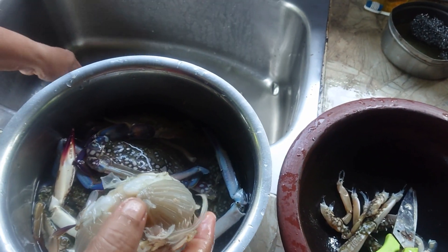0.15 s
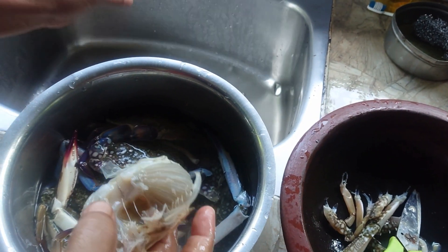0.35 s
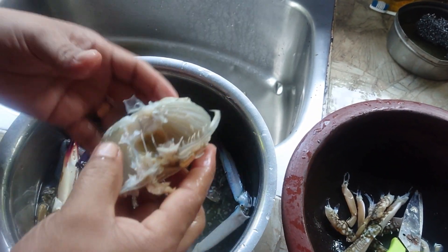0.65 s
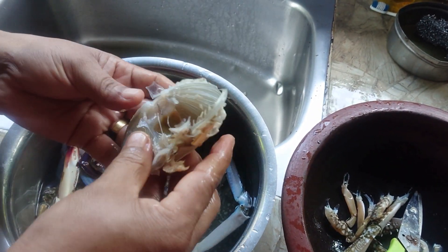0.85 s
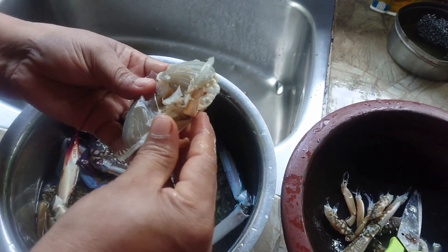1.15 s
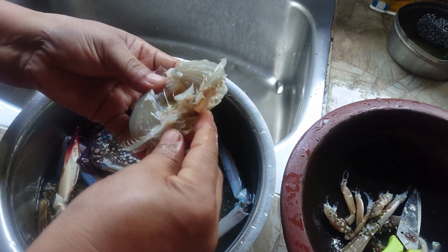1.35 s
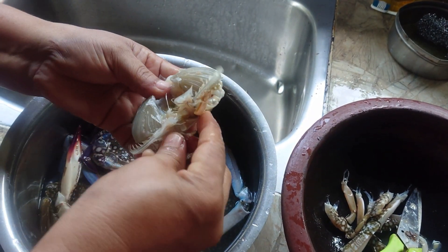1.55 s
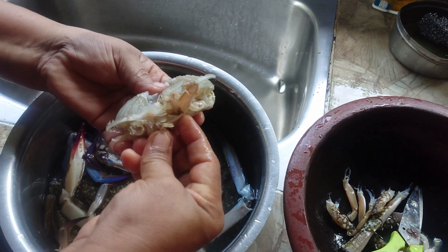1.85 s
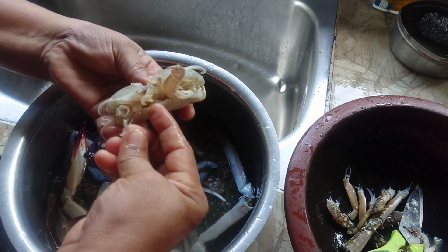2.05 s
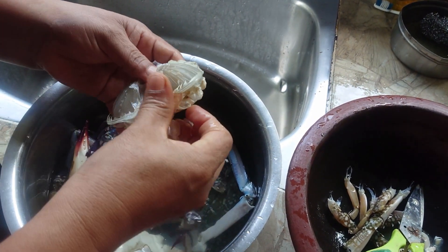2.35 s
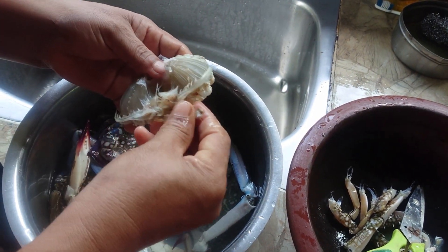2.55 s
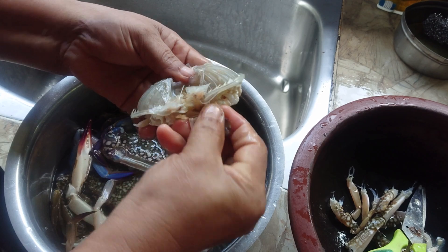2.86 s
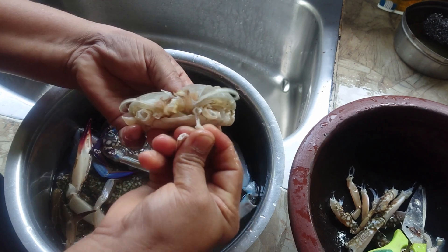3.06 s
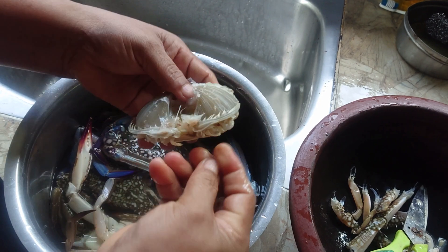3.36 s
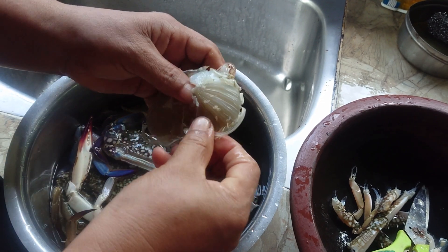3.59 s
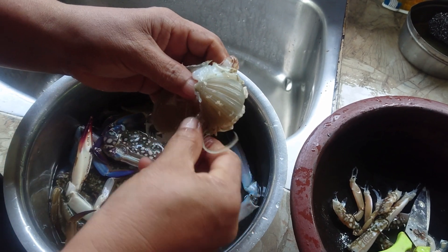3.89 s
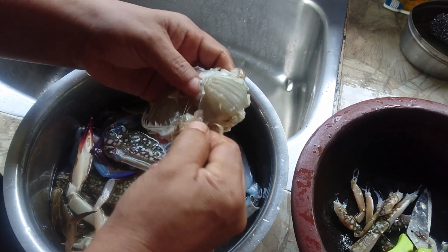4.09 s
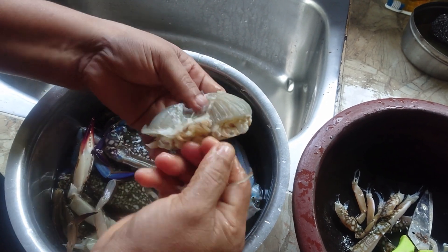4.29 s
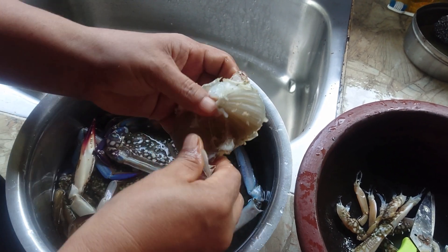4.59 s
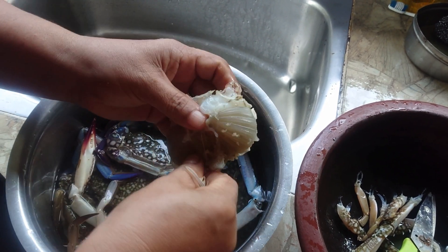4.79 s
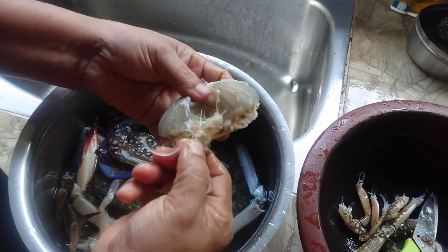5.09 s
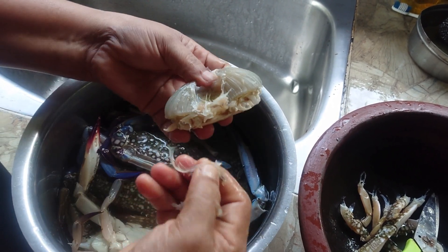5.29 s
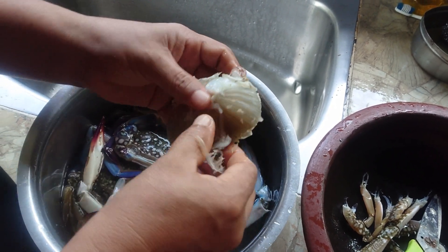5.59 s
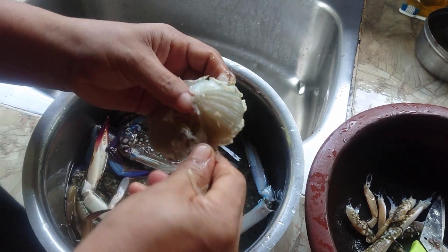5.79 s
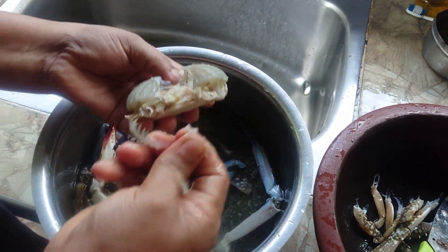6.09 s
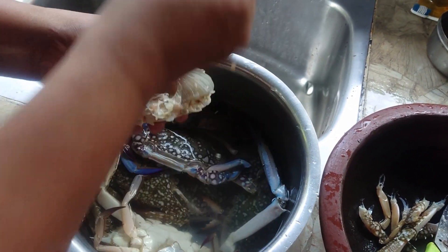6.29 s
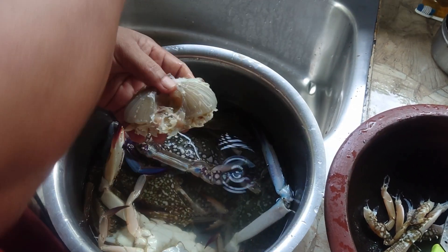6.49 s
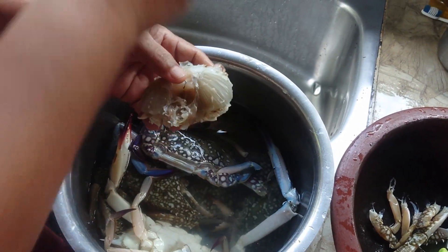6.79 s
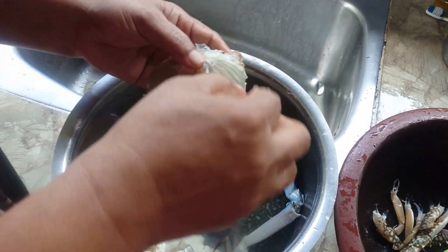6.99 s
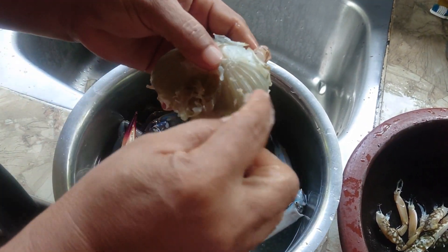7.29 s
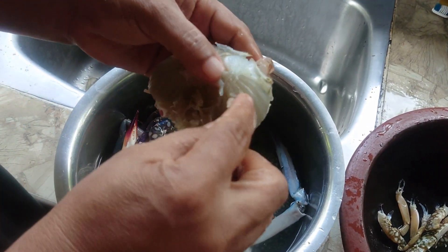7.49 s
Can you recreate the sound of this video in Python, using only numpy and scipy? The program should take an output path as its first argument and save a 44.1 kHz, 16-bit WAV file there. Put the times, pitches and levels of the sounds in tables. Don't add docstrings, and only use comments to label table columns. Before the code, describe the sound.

Low street rumble, soft tyre roar and a faint idling drone run throughout. At 0.28-0.6 s, crab scraps hit a steel basin in a dense burst of sharp crunchy cracks, the loudest event, with short low metallic ringing and rattling crumbs to about 0.8 s. A thin chirp follows at 0.9. Bright small snaps come at 1.8 and 2.0, a soft far knock at 2.5, and a double snap at 3.07. From 2.8 to about 5 a distant two-note bird repeats, with falling chirps and throbbing trills until 5.9. A faint snap at 4.3 leads to clusters of tiny ticks and tearing around 5.1 and 5.8-6.1, while a far engine speeds up. At 6.8 a scrap crunches into a clay pot with a brief dull ring; crumbs settle and traffic rises to 7.6. Close, lightly reverberant kitchen sound on the right; left has only quiet hiss.

```python
import sys
import numpy as np
from scipy import signal
from scipy.io import wavfile
from scipy.ndimage import uniform_filter1d

SR = 44100
rng = np.random.default_rng(int(sys.argv[2]) if len(sys.argv) > 2 else 0)


def generate_wav(sig):
    pcm = np.round(np.clip(np.atleast_2d(sig).T, -1, 1) * 32767).astype(np.int16)
    wavfile.write(sys.argv[1], SR, pcm)


def voltage_ratio(decibels):
    exponent = np.asarray(decibels, float) / 20
    return 10 ** exponent


N = 337365


def crab():
    snaps = finger_snaps() + pot_scatter()
    cracks = scrap_cracks()
    ring = basin_ring() + pot_ring()
    return snaps + cracks + ring + room(voltage_ratio(-16) * snaps + voltage_ratio(-11.5) * cracks + voltage_ratio(-7.5) * ring)


# start in seconds, peak in dB, body 1-3 kHz in relative dB,
# edge 9-15 kHz in relative dB, crunch length in ms.
DROPS = [(.2806, -27, 7, -4.5, 12.2), (0.2922, -18, -1, -11, 5.6), (.3049, -35, 11, -34, 7.8),
         (0.3161, -21.5, -6, -8, 4.9), (0.3204, -15.5, -2.5, -8, 6), (0.329, -42, 19, -19, 8.5),
         (0.3566, -38, -19, -3, 21), (0.4285, -43.5, 7, 0, 1.3), (0.46, -30, -2, -6, 2.6),
         (0.4624, -17.5, -3.5, -18, 1.6), (.466, -29.5, 3.5, -5, 14), (0.4771, -24, 2, -6, 1.8),
         (0.4888, -22, 3, -16, 2.8), (0.5052, -40.5, 12, -2, 3.5), (0.5567, -42, 3, 1.5, 9.1),
         (.572, -41.5, 5.5, -22, 5.3), (.6134, -40.5, -9, -2, 4.4), (0.632, -39.5, -3, -8, 4.1),
         (.673, -47.5, -5, -10, 4), (0.687, -51.5, 1, -10, 7.4), (0.7451, -43, 6.5, -13, 3.7),
         (0.777, -62, 15, 2, 2.3), (0.797, -54.5, 3, -1, 4.8)]


def scrap_cracks():
    cracks = np.zeros(N)
    for s, db, body_db, edge_db, crunch_ms in DROPS:
        drive = crunch(crunch_ms, rng.random((2, 2500)), lead=0.2)
        add(cracks, s, crack(drive, db, body_db, edge_db, SHELL[1][0], rng.random(4)))
    return cracks


# frequency in Hz, level in dB, t60 in seconds.
BASIN = [(122.3, -3, 0.15), (138, -4.5, 0.2), (187, 0, 0.053), (221.5, 1.5, 0.062), (332, -9, 0.049),
         (365, 3, 0.075), (382, -10, 0.059), (510, -2, 0.045), (600, -3.5, 0.087), (661, -11.5, 0.13),
         (849, -13.5, 0.11), (830, -10, 0.15), (1026, -9, 0.12), (1126, -6.5, 0.15), (1392, -9, 0.1103),
         (1490, -16, 0.061)]
# start in seconds, basin level in dB, free wall level in dB.
BLOWS = [(0.2817, -29.5, -60), (0.2912, -32.5, -36.5), (0.3048, -31, -56), (0.3221, -29, -62),
         (0.3409, -37, -60), (0.4621, -38.5, -42), (0.4764, -25.5, -27.5), (0.4887, -31, -39),
         (0.5059, -29.5, -62), (0.5569, -36, -33.5), (.572, -38, -60), (0.6128, -44, -46),
         (.672, -40.5, -42), (0.7455, -43, -46), (0.7764, -45.5, -63)]


def basin_ring():
    wall_hz, wall_t60_s = 277, 0.29
    ring, t = np.zeros(N), np.arange(SR // 2) / SR
    for s, basin_db, wall_db in BLOWS:
        modes = np.zeros(len(t))
        uneven, detune = rng.standard_normal((2, len(BASIN)))
        for (hz, db, t60_s), c, e in zip(BASIN, uneven, detune):
            level = np.sign(c) * voltage_ratio(db - 60 * t / t60_s + 2.0 * c)
            modes += level * np.sin(2 * np.pi * hz * (1 + 0.0283 * e) * t)
        add(ring, s, voltage_ratio(basin_db - 6) * modes * np.minimum(t / 0.0028, 1))
        wall = voltage_ratio(wall_db - 60 * t / wall_t60_s) * np.sin(2 * np.pi * wall_hz * t)
        add(ring, s, wall * np.minimum(t / 0.01, 1))
    return ring


# start in seconds, peak in dB, body 1-3 kHz in relative dB,
# edge 9-15 kHz in relative dB, middle resonance in Hz.
SNAPS = [
    (1.7943, -42.5, -6.5, 8.5, 5200),
    (2.0039, -32.5, -2.5, 10, 4760),
    (2.0153, -50, 0, 9.5, 4740),
    (3.068, -37, -9, -11, 4400),
    (3.0743, -33.5, -4, 4.5, 4460),
    (3.079, -47, 1, -8, 3600),
    (4.2787, -46, -5.5, -3.5, 2400),
    (5.1582, -44.5, -26, 2, 3630),
    (6.0419, -41, -5.5, -7, 4860),
    (6.0616, -46.5, -6, -22, 3880),
]
# start in seconds, peak in dB, edge in relative dB.
TICKS = [(1.881, -65, 20.5), (2.5252, -52.5, -19), (3.8546, -61, 4), (4.0442, -62, 8), (4.153, -53, 13.5),
         (4.1667, -49.5, -30), (4.903, -53, -6), (4.9488, -52.5, 3), (5.0852, -46.5, 5), (5.11, -53, 11),
         (5.1144, -51, 18), (5.1338, -54, 13), (5.1422, -50, 0), (5.1746, -46.5, 6.5), (5.192, -58, 9),
         (5.2857, -65.5, 19.5), (5.3964, -55.5, -2), (5.784, -56.5, 3), (5.829, -54.5, 14.5),
         (5.8374, -67, 12), (5.848, -66, 10), (5.8562, -57, 10), (5.8602, -58, 13.5), (5.889, -63, 2),
         (5.914, -60, 10), (5.954, -59, 13.5), (5.9694, -62, 9), (5.987, -62, 3), (6.046, -57, 19),
         (6.079, -55.5, 4)]


def finger_snaps():
    tick_body_db, tick_hz = -7.5, 4460
    snaps = np.zeros(N)
    ticks = [(s, db, tick_body_db, edge_db, tick_hz) for s, db, edge_db in TICKS]
    for s, db, body_db, edge_db, mid_hz in SNAPS + ticks:
        crunch_ms = 3.05 + 0.2 * (db + 46)
        drive = crunch(crunch_ms, rng.random((2, 1500)), lead=1.18)
        add(snaps, s, crack(drive, db, body_db, edge_db, mid_hz, rng.random(4)))
    return snaps


# start in seconds, peak in dB, body in relative dB,
# edge in relative dB, crunch length in ms.
SCATTER = [
    (6.796, -55, -10, 4, 2.5),
    (6.7987, -28, -4, 1.5, 7.6),
    (6.806, -34.5, 2, -10, 11.7),
    (6.813, -42.5, 7.5, -3, 8.2),
    (6.8988, -47, 1.5, 1.5, 16.5),
]


def pot_scatter():
    pieces = np.zeros(N)
    for s, db, body_db, edge_db, crunch_ms in SCATTER:
        drive = crunch(crunch_ms, rng.random((2, 2500)), lead=0.93)
        add(pieces, s, crack(drive, db, body_db, edge_db, 4720, rng.random(4)))
    return pieces


# frequency in Hz, level in dB, t60 in seconds.
POT = [(120, -38, 0.18), (160, -42, 0.1), (230, -42.5, 0.082), (750, -41, 0.07), (1173, -34, 0.053),
       (1480, -73, 0.046), (1970, -38, .03)]


def pot_ring():
    ring, t = np.zeros(N), np.arange(SR // 2) / SR
    modes = sum(voltage_ratio(db - 60 * t / t60_s) * np.sin(2 * np.pi * hz * t) for hz, db, t60_s in POT)
    add(ring, 6.8, modes * np.minimum(t / 0.003, 1))
    return ring


def crunch(ms, chance, lead, grain_db=2.5):
    t = np.arange(chance.shape[1]) / SR
    decay_ms = max(ms, 0.2)
    swarm = np.sign(chance[0] - 0.5) * voltage_ratio(-grain_db * np.log(chance[1] + 0.00063))
    first_break = lead * np.exp(-0.5 * ((t - 0.0007) / 0.00016) ** 2)
    shape = np.exp(-t / (decay_ms / 1000)) + first_break
    onset = np.minimum((t + 1 / SR) / (0.0001 * decay_ms), 1)
    return swarm * shape * onset


# centre in Hz, width in Hz.
SHELL = [
    (1557, 1240),
    (4330, 1840),
    (10970, 4000),
    (2820, 2470),
]


def crack(drive, db, body_db, edge_db, mid_hz, chance):
    centres_hz = np.array([SHELL[0][0], mid_hz, SHELL[2][0], SHELL[3][0]]) * (0.94 + 0.11 * chance)
    levels_db = (body_db, 0, edge_db, body_db / 2 - 8.5)
    sound = np.zeros(len(drive))
    for hz, (_, width_hz), level_db, sign in zip(centres_hz, SHELL, levels_db, (1, 1, 1, -1)):
        band = resonate(resonate(drive, hz, width_hz), hz, width_hz)
        sound += sign * voltage_ratio(db + level_db) * band / abs(band).max()
    return signal.lfilter(*signal.butter(2, 14500, fs=SR), sound)


# centre in seconds, spread in seconds, level in dB,
# body in relative dB.
TEARS = [
    (.36, .03, -64, 14.5),
    (.52, 0.021, -70, 18),
    (.6, 0.05, -75, 20),
    (5.13, .04, -70, -12),
    (5.86, 0.043, -74, -9),
    (6.065, .015, -67, -10),
    (6.95, 0.044, -77, 0),
]


def tearing():
    sizes = voltage_ratio(1.9 * np.minimum(rng.exponential(1, N), 4))
    fibres = rng.standard_normal(N) * sizes * (rng.random(N) < 4000 / SR)
    upper = evened(resonate(fibres, *SHELL[2]) + voltage_ratio(-5) * resonate(fibres, *SHELL[1]))
    body = evened(resonate(resonate(fibres, 1200, 2100), 1200, 2100))
    upper_level = swells([row[:3] for row in TEARS])
    body_level = swells([(s, spread_s, db + body_db) for s, spread_s, db, body_db in TEARS])
    return upper_level * upper + body_level * body


# start in seconds, level in dB, resonance in Hz.
BUMPS = [
    (2.497, -64.5, 330),
    (2.6, -71, 298),
    (6.555, -65.5, 345),
]


def bumps():
    knocks = np.zeros(N)
    for s, db, hz in BUMPS:
        drive = crunch(12.6, rng.random((2, 2000)), lead=0)
        add(knocks, s, voltage_ratio(db) * evened(resonate(resonate(drive, hz, 1000), hz, 1100)))
    return knocks + voltage_ratio(-1) * room(knocks)


# start in seconds, level in dB, level note in Hz.
PHRASES = [(2.78, -86, 3150), (3.149, -81, 2920), (3.57, -79.5, 2960), (3.886, -76.5, 2850),
           (4.21, -79.5, 2950), (4.51, -78.5, 3060), (4.87, -81.5, 3000)]
# start in seconds, length in seconds, start in Hz, end in Hz, level in dB.
CHIRPS = [
    (0.899, 0.076, 5170, 4930, -80),
    (3.41, 0.15, 7750, 5130, -81.5),
    (4.41, 0.173, 7400, 4580, -79.5),
    (5.594, 0.072, 7560, 5130, -78),
    (6.93, 0.14, 5400, 4900, -81),
]
# centre in seconds, spread in seconds, level in dB.
TRILL = [(2.42, .06, -85.5), (2.69, 0.071, -83), (4.75, 0.024, -78.5), (5.07, 0.12, -83),
         (5.39, 0.12, -83.5), (5.6, 0.061, -76.5), (5.83, 0.044, -74.5), (5.89, 0.016, -79.5)]


def birds():
    song, t = np.zeros(N), np.arange(N) / SR
    notes = [(s, 0.16, 1.014 * hz, hz, db) for s, db, hz in PHRASES]
    notes += [(s + 0.1, 0.14, 1970, 1830, db + 3.5) for s, db, hz in PHRASES]
    for s, length_s, from_hz, to_hz, db in notes + CHIRPS:
        u = np.linspace(0, 1, round(length_s * SR))
        glide_hz = to_hz + (from_hz - to_hz) * (1 - u) ** 3.37
        whistle = resonate(rng.standard_normal(len(u)), glide_hz, 110)
        add(song, s, voltage_ratio(db) * evened(whistle) * np.sin(np.pi * u ** 0.5))
    throb = 1 + 0.97 * np.sin(2 * np.pi * 28 * t)
    reedy = resonate(resonate(rng.standard_normal(N), 4440, 500), 4440, 500)
    song += swells(TRILL) * evened(throb * reedy)
    return song + voltage_ratio(2) * room(song)


# time in seconds, firing rate in Hz.
ENGINE = [
    (2.8, 26.5),
    (5, 29.8),
    (6.8, 33.46),
    (7.65, 33.1),
]
# order number, top level in dB, time of top in seconds,
# fall in dB per second before, fall in dB per second after.
ORDERS_HEARD = [
    (5, -68, 7.37, 25, 2.5),
    (6, -67.5, 5.8, 4.5, 2),
    (7, -68, 6.88, 13, 12.5),
]
# centre in seconds, level in dB.
DRONE = [(.3, -63), (1.07, -71), (1.4, -68), (1.82, -70), (2.6, -62), (3.22, -60.5), (3.7, -68.5),
         (4.1, -65), (4.55, -66), (5.2, -64), (5.9, -70), (6.7, -74)]


def engine():
    surge_s, idle_db, drone_hz, drone_width_hz = 0.11, -77, 66.8, 9.8
    t = np.arange(N) / SR
    firing_hz = np.interp(t, *np.transpose(ENGINE))
    surge = voltage_ratio(idle_db) + swells([(s, surge_s, db) for s, db in DRONE])
    hum = resonate(rng.standard_normal(N), drone_hz, drone_width_hz)
    sound = surge * evened(resonate(hum, drone_hz, drone_width_hz))
    for order, db, s, before, after in ORDERS_HEARD:
        hz = order * firing_hz
        level = voltage_ratio(db - np.maximum(before * (s - t), after * (t - s)))
        tone = 0.024 * np.sin(2 * np.pi * np.cumsum(hz) / SR)
        sound += level * evened(resonate(rng.standard_normal(N), hz, 3.6) + tone)
    return sound


# frequency in Hz, level in dB per Hz.
FLOOR = [(15, -41), (25, -49), (46, -6), (66, -2.5), (183, -13), (210, -17), (314, -18), (568, -20.5),
         (1860, -19.5), (2940, -31), (3270, -33.5), (6590, -38.5), (7750, -63), (9610, -31.5), (15600, -45)]
# centre in Hz, width in Hz, height in dB.
HUMPS = [(880, 13, 8), (1212, 154, 7), (2400, 49, 8.5), (4630, 390, 7), (6630, 454, 14.5), (9570, 244, 10),
         (8120, 750, 2)]
# time in seconds, tyre roar in dB.
TRAFFIC = [
    (0, -4.5),
    (1, -2),
    (2.5, -4.5),
    (6.3, -4),
    (7.65, -1),
]


def street():
    floor_db, rumble_db = -63, 4
    hz, t = np.fft.rfftfreq(2048, 1 / SR)[:, None], np.arange(N // 512 + 5) * 512 / SR
    roar_db = np.interp(t, *np.transpose(TRAFFIC))
    field = read(FLOOR, hz)
    for centre_hz, width_hz, db in HUMPS:
        field = field + db * np.exp(-0.5 * ((hz - centre_hz) / width_hz) ** 2)
    field = field + rumble_db * np.exp(-0.5 * (np.log(hz / 170 + 0.00134) / 0.85) ** 2)
    field = field + roar_db * np.exp(-0.5 * (np.log(hz / 1200 + 0.00083) / 0.21) ** 2)
    return voltage_ratio(floor_db) * noise(field, 0.56)


# frequency in Hz, level in dB per Hz.
HISS = [(30, -6), (60, 4.5), (200, -3.5), (600, -9), (2000, -16), (5000, -19), (6000, -79), (7000, -66),
        (9000, -79), (10000, -50.5), (11500, -21.5), (15700, -23)]


def amplifier_hiss():
    hz = np.fft.rfftfreq(2048, 1 / SR)[:, None]
    return voltage_ratio(-72) * noise(read(HISS, hz) + np.zeros(N // 512 + 5), 0.3)


# frequency in Hz, t60 in seconds.
KITCHEN = [(200, 0.45), (1000, 0.42), (4000, 0.25), (10000, 0.21), (16000, 0.11)]


def room(x):
    taps = np.zeros(SR // 2)
    at = np.arange(100, len(taps) - 20, 20)
    taps[at + rng.integers(0, 20, len(at))] = rng.choice([-1., 1.], len(at))
    hz, t, z = signal.stft(taps, SR, nperseg=256)
    tail = signal.istft(z * voltage_ratio(-60 * t / read(KITCHEN, hz)[:, None]), SR, nperseg=256)[1]
    return signal.fftconvolve(x, tail / np.linalg.norm(tail))[:N]


def noise(shape_db, patch_db):
    a, b, patches, mottle = rng.standard_normal((4,) + shape_db.shape)
    patches = evened(uniform_filter1d(uniform_filter1d(patches, size=10, axis=0), size=12, axis=1))
    mottle = evened(uniform_filter1d(uniform_filter1d(mottle, size=14, axis=0), size=2, axis=1))
    hz = np.fft.rfftfreq(2048, 1 / SR)[:, None]
    field = shape_db + patch_db * patches + 2.76 * np.clip(hz / 12000, 0, 1) ** 2 * mottle
    spectra = (a + 1j * b) * voltage_ratio(field) * (hz < 15750)
    return evened(signal.istft(spectra, nperseg=2048, noverlap=1536)[1][:N])


def resonate(x, hz, width_hz):
    turn = np.exp(2j * np.pi * np.cumsum(hz * np.ones(len(x))) / SR)
    r = np.exp(-np.pi * width_hz / SR)
    return 2 * (turn * signal.lfilter([1 - r], [1, -r], x / turn)).real


def swells(rows):
    t = np.arange(0, N + 64, 64) / SR
    level = sum(voltage_ratio(db) * np.exp(-0.5 * ((t - s) / spread_s) ** 2) for s, spread_s, db in rows)
    return np.interp(np.arange(N) / SR, t, level)


def evened(x):
    return x / np.sqrt(np.mean(x ** 2) + 1e-20)


def read(points, hz):
    f, value = np.transpose(points)
    return np.interp(np.log(hz + 1), np.log(f + 1), value)


def add(mix, s, sound):
    part = mix[round(s * SR):][:len(sound)]
    part += sound[:len(part)]


def scene():
    right = 2 * (crab() + tearing() + bumps() + birds() + engine() + street())
    return np.array([amplifier_hiss(), right])


def top_cut(x):
    return signal.sosfilt(signal.butter(12, 16510, fs=SR, output="sos"), x)


def record(dry):
    left, right = dry
    notched = right - 0.49 * resonate(right, 7670, 1690)
    mix = np.array([left, 0.43 * np.tanh(notched / 0.47)])
    return top_cut(mix)


dry = scene()
out = record(dry)
generate_wav(out)
```